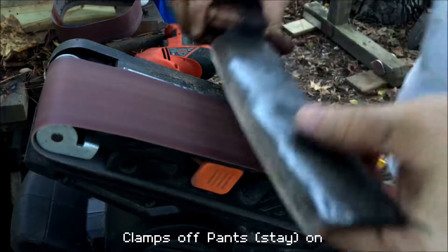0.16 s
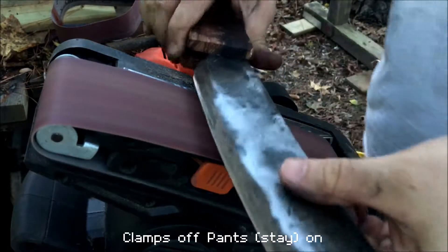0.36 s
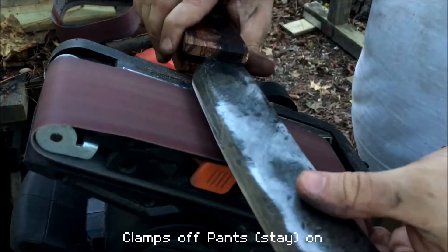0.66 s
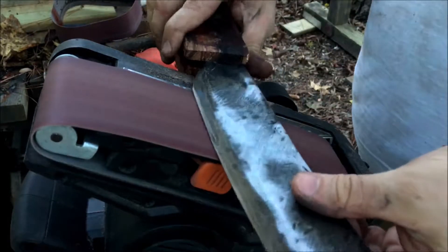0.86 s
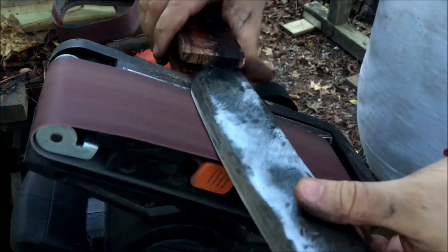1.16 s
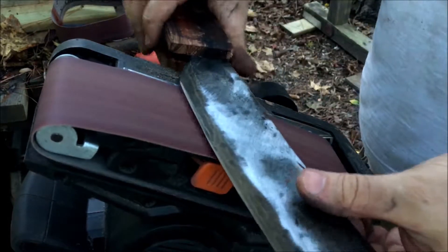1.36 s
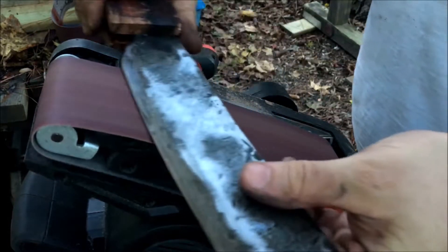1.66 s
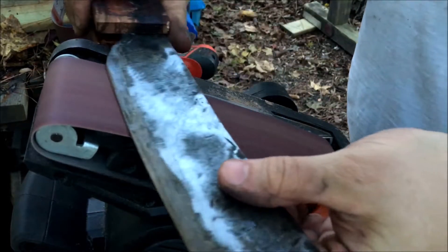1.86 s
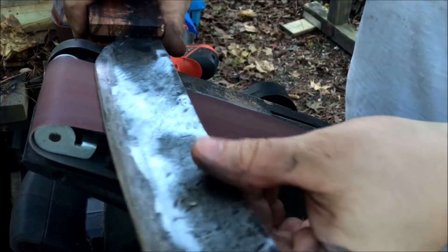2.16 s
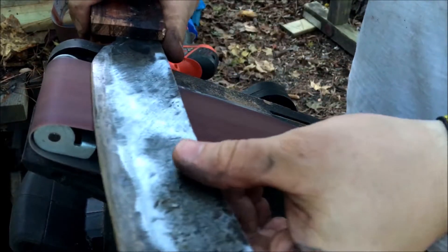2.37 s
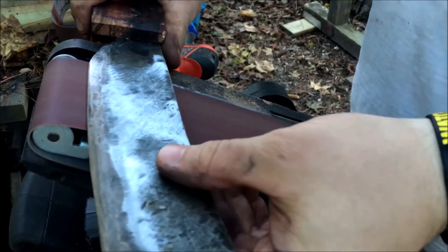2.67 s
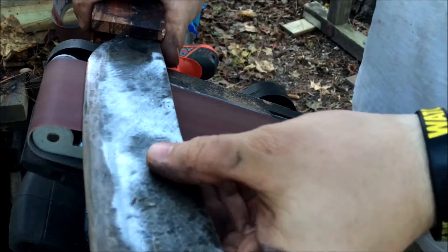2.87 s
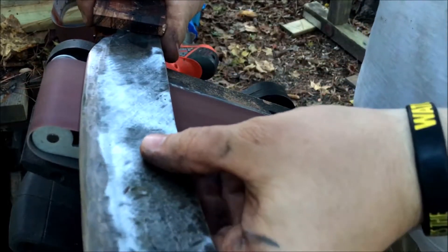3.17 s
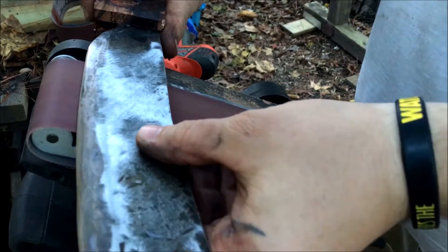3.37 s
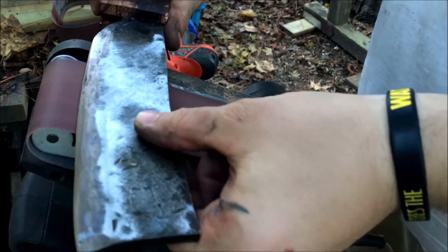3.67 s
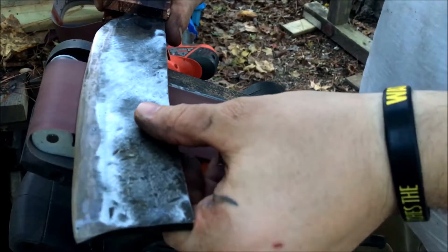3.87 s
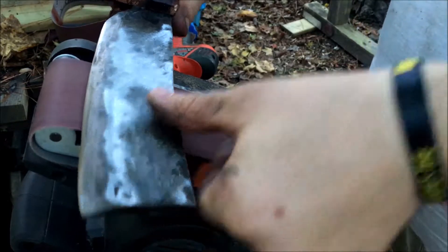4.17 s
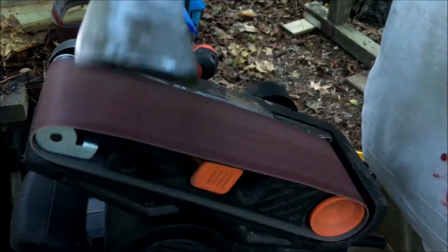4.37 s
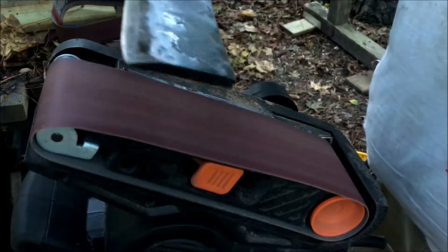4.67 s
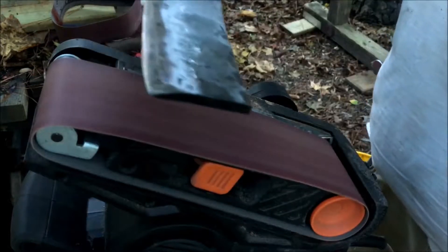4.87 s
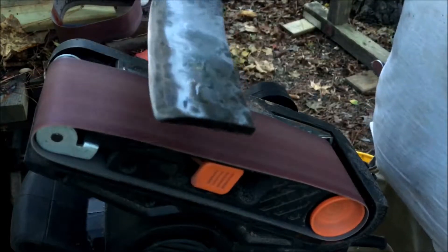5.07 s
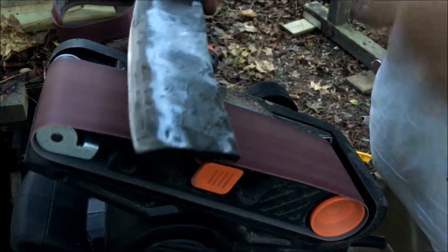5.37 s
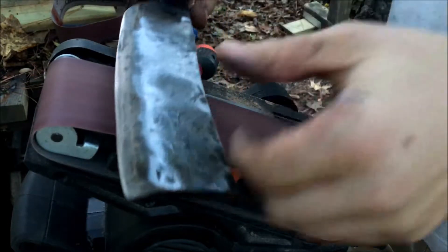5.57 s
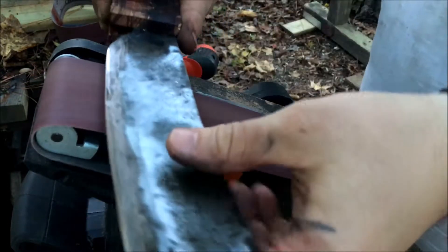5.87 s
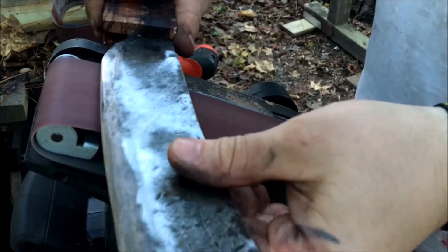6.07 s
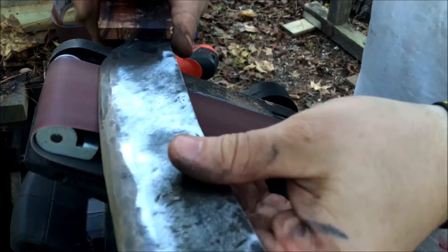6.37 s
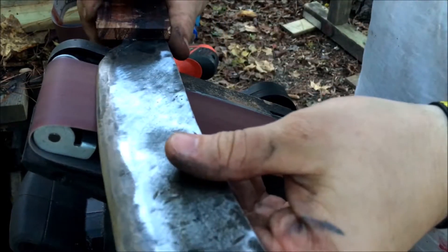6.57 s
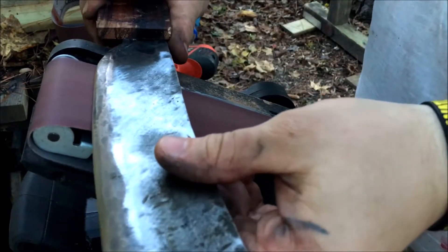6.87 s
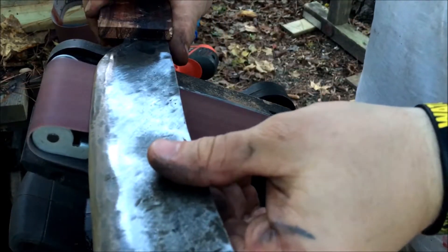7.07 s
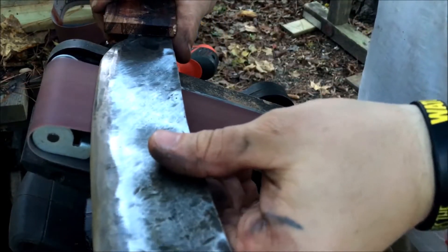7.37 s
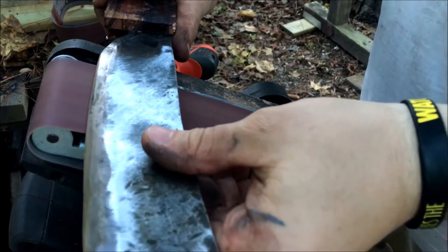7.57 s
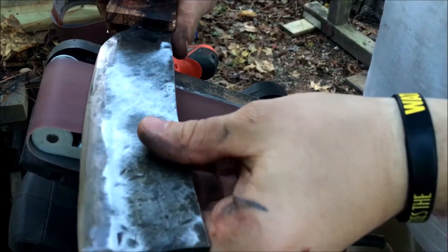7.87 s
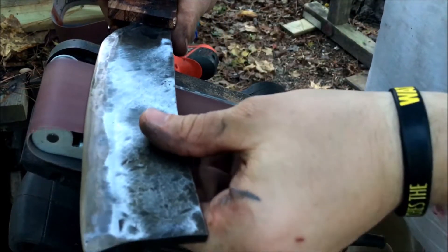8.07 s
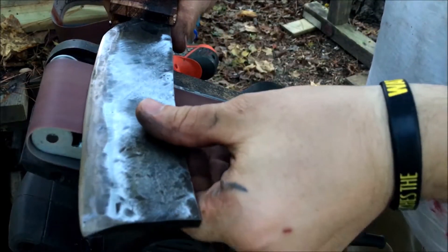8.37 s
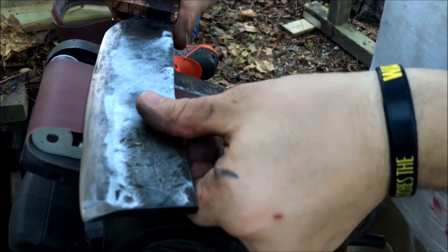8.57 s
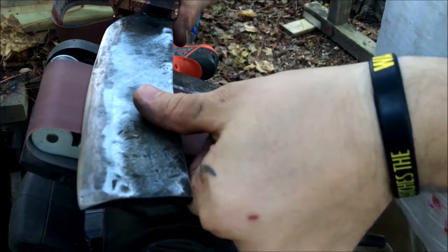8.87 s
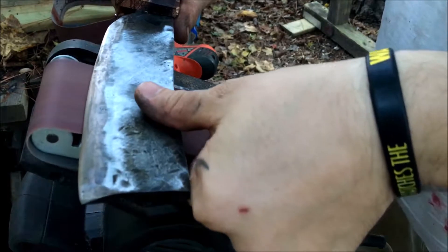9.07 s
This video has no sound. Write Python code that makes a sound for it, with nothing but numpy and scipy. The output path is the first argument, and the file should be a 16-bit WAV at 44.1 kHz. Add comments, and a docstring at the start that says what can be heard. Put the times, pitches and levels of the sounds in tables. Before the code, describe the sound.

A steady high whine and rushing air come from a belt sander, heard up close in the open with no echo. A steel blade is ground on it in two passes with a very brief lift midway. Each starts as a gritty rasp with faint metallic ringing and grows into a bright hiss, while the motor drops a little in pitch under the pressure.

```python
"""A high motor whine over a roar of air: an upturned electric belt sander runs outdoors, close by.
The motor turns near 27000 rpm; cooling air and the belt sound the plastic housing, the frame hums.
A steel cleaver is ground on the belt in two passes and lifts off briefly between them. Grit rasps
on the steel and rubs it into ringing; as the blade is pressed down, the motor sags in pitch
and the rasp turns to a bright hiss."""
import sys
import numpy as np
from scipy import signal
from scipy.fft import rfft, irfft
from scipy.io import wavfile
from scipy.ndimage import map_coordinates

SR = 44100
rng = np.random.default_rng(int(sys.argv[2]) if len(sys.argv) > 2 else 0)


def transcribe(u):
    """Save the signal u as a 16-bit wav file named by the first command-line argument.

    u: samples, shape (n,) or (channels, n), limited to [-1, 1]; the rate is SR.
    q: integer samples, one column per channel.
    """
    v = np.clip(np.atleast_2d(u).T, -1, 1)
    q = np.round(v * 32767).astype(np.int16)
    wavfile.write(sys.argv[1], SR, q)


N = 406602
TIME = np.arange(N) / SR
FREQS = np.maximum(np.arange(N // 2 + 1) * SR / N, 1)

# pitch curve of the motor shaft (time [s], speed [turns/s])
SHAFT_SPEED = [(0.0, 459.5), (1.3, 459.35), (1.65, 458.6), (2.1, 459.1), (2.95, 457.0), (3.4, 452.2),
               (3.8, 447.1), (4.1, 444.7), (4.48, 444.7), (4.7, 452.2), (4.95, 456.5), (5.35, 459.2),
               (6.3, 459.7), (7.2, 457.7), (7.55, 452.8), (7.9, 449.0), (8.8, 441.5), (9.22, 440.1)]
# rotor harmonics, fundamental first (multiple of the shaft rate, level [dB])
ROTOR_TONES = [(1, 0.0), (4, -13), (5, -4), (6, -7), (9, -17), (10, -21), (12, -15), (15, -18), (17, -25),
               (19, -15)]
# those harmonics swell or sink as the hands move over the machine (start [s], end [s], gain [dB])
ROTOR_SWELLS = [(.8, 2.6, .7), (4.85, 6.0, -1.3)]
# the bearing's ball-pass tone, then its sidebands and octave (multiple of the shaft rate, level [dB])
BEARING_TONES = [(2.61, 0), (3.61, -7), (4.61, -4), (5.22, -32)]
# level rides on the bearing's upper tones (start [s], end [s], gain [dB])
BEARING_SWELLS = [(.6, 1.6, 0), (2.05, 2.4, 5.5), (2.85, 3.25, 7), (5.65, 6.1, -1), (6.25, 8.3, 2)]
# tones of the toothed drive (multiple of the pulley rate, level [dB])
DRIVE_TONES = [(5, -13), (9, -13), (10, 0), (14, -3.5), (15, -6), (20, -4), (25, -13)]
# level rides on single drive tones (start [s], end [s], multiple of the pulley rate, gain [dB])
DRIVE_SWELLS = [(-.2, .5, 10, 4), (-.2, .6, 20, -11), (1.9, 2.3, 10, 2), (2.5, 3.4, 20, 3),
                (4.18, 4.52, 10, 5), (4.2, 5.5, 20, -0.5), (4.62, 5.7, 10, -1), (6.55, 7.048, 10, 5),
                (7.604, 8.405, 20, 0.5), (8.0, 9.4, 10, 1), (8.5, 9.4, 20, -2)]
# level rides on the fan's whistle (start [s], end [s], gain [dB])
FAN_SWELLS = [(-.2, .55, 9.5), (.55, 1.25, 7), (1.75, 2.14, 7), (2.8, 3.1, 4), (3.5, 3.8, 5),
              (4.55, 4.95, 9), (5.1, 5.55, 8), (5.83, 6.06, 12), (6.06, 6.4, -3), (6.95, 7.15, 4.5),
              (7.3, 7.65, 9), (7.65, 8.05, 2)]
# noise of cooling air and belt (frequency [Hz], level [dB])
ROAR_SPECTRUM = [(20, -50), (60, -28), (150, -30), (330, -13), (550, -12.5), (1000, -6.5), (1600, -4),
                 (2200, -0.7), (3200, -6), (4500, -8), (5200, -10), (7500, -26), (11000, -32), (16000, -25)]
# resonances of the plastic housing (frequency [Hz], width [Hz], gain [dB])
HOUSING_MODES = [(395, 210, 2.5), (691, 187, 9), (1050, 110, 3), (1190, 320, 5), (1610, 130.1, 1),
                 (1848, 550, 6), (2464, 400, 5.5), (2660, 160, 1.5), (3140, 460, 7), (3800, 430, 6.5),
                 (4760, 810, 6.5)]

# the blade lies on the belt (start [s], end [s], gain of the rasp at full load [dB])
PASSES = [(-.2, 4.51, -7.5), (4.69, 9.4, -2.5)]
# grit scraping the steel (frequency [Hz], level [dB])
RASP_SPECTRUM = [(500, -24), (1500, -3), (3400, 2), (5500, 3.5), (7000, 0.5), (8800, 2.5), (9700, -3),
                 (11000, -32), (16000, -10)]
# grit cutting the steel (frequency [Hz], level [dB])
HISS_SPECTRUM = [(4000, -19.5), (7400, -10.5), (8000, -6), (8700, -1.5), (9700, 0), (10200, -0.5),
                 (10900, 2), (12000, 0), (12700, -2), (13400, -3), (14200, -6.5), (16000, -9.5)]
# high, crowded modes of the steel (frequency [Hz], width [Hz], gain [dB])
STEEL_MODES = [(5050, 130, 4.5), (5630, 200, -0.5), (6050, 140, 3.5), (6880, 350, 4), (8750, 180, -2),
               (9500, 220, -1.5), (10100, 200, 2.5), (10800, 180, 5), (12100, 220, 0.5), (13300, 200, 0),
               (14650, 220, -1)]
# the grit bites harder or lighter as the blade rocks (start [s], end [s], gain of the hiss [dB])
BITES = [(1.42, 1.7, 2.5), (2.26, 2.798, 3.5), (2.808, 3.153, 6.5), (3.14, 4.526, 7.5), (4.95, 5.799, 1),
         (5.9, 6.55, -2), (6.55, 6.72, 1.5), (6.72, 6.948, 3), (6.946, 7.263, 0.5), (7.261, 7.75, 4),
         (7.75, 7.981, 5), (7.978, 8.849, 8.5), (8.856, 9.4, 8)]
# ringing modes of the blade (frequency [Hz], width [Hz])
BLADE_MODES = [(1370, 900), (2212, 470), (2620, 280), (3400, 310), (4610, 200), (5550, 560), (8820, 490),
               (11330, 800), (9960, 400), (9500, 450), (1785, 230), (12130, 490)]
# the belt rubs one mode into ringing (start [s], end [s], mode number from 1, level [dB])
BLADE_RUBS = [(-.2, 0.45, 2, -43), (.3, 2.36, 4, -50.5), (.4, 1.6, 2, -48), (1.0, 2.05, 1, -50.5),
              (1.1, 2.1, 7, -53.5), (1.9, 3, 2, -45), (2.1, 2.86, 3, -55), (2.45, 3.3, 10, -54),
              (2.8, 3.42, 8, -48), (3.25, 4.2, 9, -55), (3.5, 4.2, 3, -52), (3.4, 4.5, 8, -50),
              (4.0, 4.6, 10, -53), (4.15, 3.5, 2, -49), (4.65, 4.75, 2, -49), (4.7, 5.5, 5, -52),
              (4.75, 6.8, 10, -55), (5.3, 5.8, 4, -50), (5.33, 7.75, 2, -44.5), (5.65, 7.1, 5, -51.5),
              (6.6, 8, 3, -46.5), (6.65, 7.9, 6, -51), (6.65, 7.25, 1, -47.5), (7.25, 7.7, 1, -42),
              (7.27, 7.6, 11, -42), (7.52, 7, 11, -51), (7.7, 8.05, 1, -44), (7.3, 8.3, 5, -53),
              (7.75, 7.98, 2, -51), (7.98, 8.28, 2, -45), (7.98, 8.5, 8, -45), (8.0, 8.35, 3, -50),
              (8.05, 11, 9, -52), (8.6, 10.9, 8, -58), (8.8, 11, 12, -50)]
# brief dips in the noise (time [s], treble gain [dB], share of the dip in the lows [0-1])
DIPS = [(1.287, -6, .3), (2.222, -10, .1), (2.588, -11, 0), (3.013, -8, .1), (3.125, -5, 0.18),
        (3.166, -9, .15), (4.676, -9, 0), (5.234, -7, 0.4), (7.17, -6, 0), (7.215, -5, 0), (7.428, -8, 0),
        (7.472, -9, 0), (7.621, -7, .25), (7.706, -6, 0), (8.133, -7, 0.4), (8.197, -6, 0.01),
        (8.304, -14, 0.6)]

# faint hum of the frame (multiple of the shaft rate, level [dB])
FRAME_TONES = [(.287, -12.5), (.4168, -7), (.581, -7.5), (1.097, -5.5)]
# hum of the rollers (multiple of the shaft rate, level [dB])
ROLLER_TONES = [(.114, -8), (.228, -7.5)]
# level rides on single roller tones (start [s], end [s], tone number from 1, gain [dB])
ROLLER_SWELLS = [(-.2, 1.3, 1, 3), (1.9, 3.3, 1, -12), (6.4, 7.8, 1, -15), (8.3, 9.4, 1, 3),
                 (.2, 1.1, 2, 3.5), (1.65, 2.5, 2, 5.5), (2.6, 3.3, 2, -8), (5.85, 6.6, 2, 3),
                 (7.0, 7.3, 2, -5), (8.75, 10.3, 2, 6)]
# lulls in the whole hum (start [s], end [s], gain [dB])
HUM_LULLS = [(2.57, 3.25, -2), (6.85, 8.05, -2.5)]
# low rumble of the frame (frequency [Hz], level [dB])
RUMBLE_SPECTRUM = [(20, -31), (35, -20), (55, -7), (80, -2.5), (130, -5), (200, -1.5), (320, -1), (500, -9),
                   (2000, -60)]
# the frame shakes harder or settles (start [s], end [s], gain of the rumble [dB])
SHAKES = [(1.4, 2.57, 2), (2.95, 3.25, -7), (3.3, 4.48, 4), (4.5, 5.0, -3), (5.6, 6.8, .5),
          (7.1, 7.8, -1.5), (8.3, 9.4, -3)]
# notches in the microphone's response (frequency [Hz], width [Hz], gain [dB])
MIC_NOTCHES = [(4960, 270, -6.5), (7840, 370, -1), (10600, 500, -6.5)]

TOUCH_S = 0.044  # half the time the blade takes to land or lift


def motor_whine(angle, load):
    """Every spinning part sings off the one shaft; rotor and bearing shudder more under load."""
    shudder_db = 0.45 + load
    return (rotor(angle, load, shudder_db) + bearing(angle, load, shudder_db)
            + toothed_drive(angle) + fan(angle) + brushes(angle))


def rotor(angle, load, shudder_db):
    """The core of the whine: shaft harmonics, ducking as hand and blade bear down and cover the machine."""
    fundamental = partials(angle, ROTOR_TONES[:1], waver_db=0.2, slip=0.02)
    overtones = partials(angle, ROTOR_TONES[1:], waver_db=2.5, slip=0.11)
    octave = partials(angle, [(2, 0)], waver_db=0.6, slip=0.08)
    drift_db = 0.03 * TIME
    level_db = -47.5 - 7.5 * load - drift_db + swells(ROTOR_SWELLS, edge_s=0.25) + shudder_db * walk(30)
    octave_db = -55 - 12.5 * load + drift_db
    return undb(level_db) * (fundamental + overtones) + undb(octave_db) * octave


def bearing(angle, load, shudder_db):
    """Passing balls add an inharmonic tone with sidebands a shaft rate apart, fainter under load."""
    ball_pass = partials(angle, BEARING_TONES[:1], waver_db=0.5, slip=0.11)
    upper = partials(angle, BEARING_TONES[1:], waver_db=0.5, slip=0.28)
    upper *= undb(swells(BEARING_SWELLS, edge_s=0.24))
    return undb(-46 - 9 * load + shudder_db * walk(40)) * (ball_pass + upper)


def toothed_drive(angle, pulley_ratio=0.4168):
    """The teeth sing at harmonics of the slower pulley; single tones swell and fade."""
    out = 0
    for multiple, db in DRIVE_TONES:
        tone = partials(pulley_ratio * angle, [(multiple, db)], waver_db=1.0, slip=0.35)
        out += undb(swells(cues_for(DRIVE_SWELLS, multiple), edge_s=0.23)) * tone
    return undb(-51) * out


def fan(angle, blades=18):
    """The cooling fan whistles at the rate its blades pass."""
    whistle = partials(angle, [(blades, 0)], waver_db=1.8, slip=0.5)
    return undb(-62.5 + swells(FAN_SWELLS, edge_s=0.059)) * whistle


def brushes(angle, bars=24):
    """The brushes sing thinly on the commutator bars, louder while the blade is clear of the machine."""
    return undb(-73 + 5 * lifted()) * partials(angle, [(bars, 0)], waver_db=1.5, slip=0.35)


def housing_roar(angle, load, pulsing=0.029, flutter_db=0.5):
    """Cooling air and the running belt sound the housing, pulsing slightly with each turn."""
    air = rng.standard_normal(N) * (1 + pulsing * np.sin(angle)) * undb(flutter_db * walk(40))
    roar = colour(air, slope_db(ROAR_SPECTRUM) + bells_db(HOUSING_MODES), unity_band_hz=(1600, 4200))
    return undb(-37.5 - 3.5 * load) * shimmer(roar, band_hz=60, life_s=0.11, depth_db=1.8)


def grinding(load, chatter_db=0.6, bite_fade_db_per_s=0.2):
    """Grit scrapes and cuts the steel: the rasp recedes under load, the hiss follows each bite."""
    scraping = undb(chatter_db * walk(60)) * grit(per_second=30000, spread_db=0.9)
    cutting = undb(chatter_db * walk(60)) * grit(per_second=32000, spread_db=1.2)
    steel_db = bells_db(STEEL_MODES)
    rasp = colour(scraping, slope_db(RASP_SPECTRUM) + steel_db, unity_band_hz=(5200, 7800))
    hiss = colour(cutting, slope_db(HISS_SPECTRUM) + steel_db, unity_band_hz=(10800, 15000))
    bite_db = sum(held(start, end, edge_s=0.035) * (db - bite_fade_db_per_s * (TIME - start))
                  for start, end, db in BITES)
    rasp_db = -46 + swells(PASSES, TOUCH_S) * load ** 2 - 6 * lifted()
    hiss_db = -49.5 + 0.5 * load + bite_db - 5 * lifted()
    return undb(rasp_db) * rasp + undb(hiss_db) * hiss


def blade_ring(pitch_drift=0.012):
    """Blade modes, heavily damped by the hands; the point of contact decides which one the grit rubs."""
    out, grains = 0, grit(per_second=6000, spread_db=1.5)
    for number, (hz, width) in enumerate(BLADE_MODES, 1):
        rubs = [(start, end, undb(db)) for start, end, db in cues_for(BLADE_RUBS, number)]
        resonance = signal.iirpeak(hz, hz / width, fs=SR)
        strikes = np.roll(grains, rng.integers(N))
        ring = signal.lfilter(*resonance, signal.lfilter(*resonance, strikes))
        playhead = np.cumsum(1 + pitch_drift * walk(3))  # the grip keeps bending the pitch
        out += swells(rubs, edge_s=0.12) * map_coordinates(ring / ring.std(), [playhead], mode="mirror")
    return out


def grain_catches(load, per_second=70, low_hz=1594, high_hz=9550, attack_s=0.014):
    """Coarse grains catch the edge; each sets off a brief metallic ping at a pitch of its own."""
    age = np.arange(SR // 4) / SR
    envelope = age / attack_s * np.exp(1 - age / attack_s)
    out = np.zeros(N + len(age))
    count = int(per_second * N / SR)
    for (when, height), size in zip(rng.random((count, 2)), rng.standard_normal(count)):
        start = int(when * N)
        octaves = height * np.log2(high_hz / low_hz)
        ping = envelope * np.sin(2 * np.pi * low_hz * 2 ** octaves * age)
        out[start:start + len(age)] += undb(-45.5 - 2.5 * octaves + 2 * size) * ping
    return undb(-5 * load) * out[:N] * (1 - lifted())


def frame_hum(angle, load, edge_s=0.08):
    """The low bed: frame and rollers hum and rumble faintly; each roller tone comes and goes."""
    rumble = colour(rng.standard_normal(N), slope_db(RUMBLE_SPECTRUM), unity_band_hz=(0, SR / 2))
    hum = partials(angle, FRAME_TONES, waver_db=2.5, slip=0.1)
    for number, tone in enumerate(ROLLER_TONES, 1):
        roller = partials(angle, [tone], waver_db=1.7, slip=0.092)
        hum += undb(swells(cues_for(ROLLER_SWELLS, number), edge_s)) * roller
    hum_db = -63.5 - 5 * load + swells(HUM_LULLS, edge_s)
    rumble_db = -63.5 - 2 * load + swells(SHAKES, edge_s)
    return undb(hum_db) * hum + undb(rumble_db) * rumble


def grit(per_second, spread_db):
    """Abrasive grains striking steel: dense clicks, a few larger than the rest."""
    hit = rng.random(N) < per_second / SR
    return hit * rng.standard_normal(N) * undb(spread_db * rng.exponential(size=N))


def partials(angle, rows, waver_db, slip):
    """Tones locked to a turning part; each wavers in level and slips a little in phase [rad]."""
    out = 0
    for multiple, db in rows:
        phase = multiple * angle + slip * walk(22) + 2 * np.pi * rng.random()
        out += undb(db + waver_db * walk(5)) * np.sin(phase)
    return np.sqrt(2) * out


def shimmer(x, band_hz, life_s, depth_db):
    """Narrow bands of x swell and fade each on their own, at about the same overall power."""
    hz, seconds, frames = signal.stft(x, SR, nperseg=1024, noverlap=768)
    chance = rng.standard_normal((512, 256))
    grid = np.meshgrid(hz / band_hz, seconds / life_s, indexing="ij")
    gain = undb(depth_db * map_coordinates(chance, grid, mode="mirror"))
    gain /= np.sqrt(np.mean(gain ** 2))
    return signal.istft(frames * gain, SR, nperseg=1024, noverlap=768)[1][:N]


def dipped(x, half_width_s=0.017, crossover_hz=2900):
    """The level ducks for an instant at each dip, mostly in the treble."""
    treble_db = low_db = 0
    for when, db, low_share in DIPS:
        dip_db = db * np.maximum(1 - np.abs(TIME - when) / half_width_s, 0) ** 2
        treble_db += dip_db
        low_db += dip_db * low_share
    treble = signal.sosfiltfilt(signal.butter(4, crossover_hz, "high", fs=SR, output="sos"), x)
    return treble * undb(treble_db) + (x - treble) * undb(low_db)


def lifted():
    """1 while the blade is off the belt, 0 while it lies on it."""
    return 1 - sum(held(start, end, TOUCH_S) for start, end, _ in PASSES)


def held(start, end, edge_s):
    """A soft gate from 0 to 1; its fades reach edge_s to either side of start and end."""
    ramp = np.clip(0.5 + np.minimum(TIME - start, end - TIME) / (2 * edge_s), 0, 1)
    return ramp * ramp * (3 - 2 * ramp)


def swells(rows, edge_s):
    """A fader curve: the sum of soft gates, one for each (start, end, size) row."""
    return sum(size * held(start, end, edge_s) for start, end, size in rows)


def cues_for(rows, tone):
    """The (start, end, dB) cues that belong to one tone or mode."""
    return [(start, end, db) for start, end, owner, db in rows if round(owner) == round(tone)]


def walk(per_second):
    """Smooth random wander with a spread of about 1."""
    steps = signal.resample(rng.standard_normal(int(per_second * N / SR) + 2), 4096)
    return np.interp(TIME, np.linspace(0, N / SR, len(steps)), steps)


def colour(x, eq_db, unity_band_hz):
    """Equalise x and bring its rms within the band to 1."""
    spectrum = rfft(x) * undb(eq_db)
    inside = (FREQS > unity_band_hz[0]) & (FREQS < unity_band_hz[1])
    return irfft(spectrum, N) * N / np.sqrt(2 * np.sum(np.abs(spectrum[inside]) ** 2))


def slope_db(points):
    """An EQ curve through (Hz, dB) points on a log-frequency axis."""
    hz, db = np.transpose(points)
    return np.interp(np.log(FREQS), np.log(hz), db)


def bells_db(rows):
    """An EQ curve of (Hz, width, dB) bells."""
    return sum(db / (1 + (2 * (FREQS - hz) / width) ** 2) for hz, width, db in rows)


def undb(db):
    """Decibels to gain."""
    return np.exp(np.asarray(db) * np.log(10) / 20)


def scene(free_hz=460, full_sag_hz=20):
    """The motor's sag gives the load, 0 to 1, which rides the mix; both ears hear the same."""
    shaft_hz = np.interp(TIME, *np.transpose(SHAFT_SPEED))
    load = np.clip((free_hz - shaft_hz) / full_sag_hz, 0, 1) ** 0.61
    angle = 2 * np.pi * np.cumsum(shaft_hz * (1 + 0.0002 * walk(25))) / SR
    air = housing_roar(angle, load)
    # the resonances flutter as the blade is rocked
    steel = shimmer(grinding(load) + blade_ring(), band_hz=75, life_s=0.18, depth_db=2.0)
    mix = motor_whine(angle, load) + dipped(air + steel) + frame_hum(angle, load) + grain_catches(load)
    return np.tile(mix, (2, 1))


def record(dry, top_hz=15750):
    """The microphone notches the treble and a steep low-pass cuts the top."""
    notched = irfft(rfft(dry) * undb(bells_db(MIC_NOTCHES)), N)
    return signal.sosfilt(signal.ellip(14, 0.1, 90, top_hz, fs=SR, output="sos"), notched)


dry = scene()
out = record(dry)
transcribe(out)
```